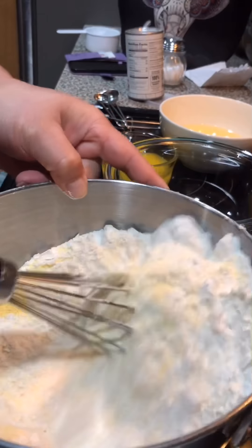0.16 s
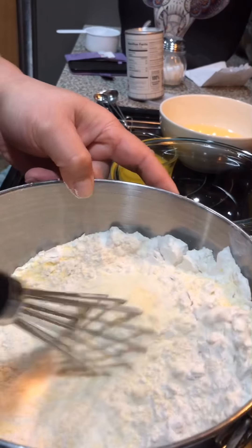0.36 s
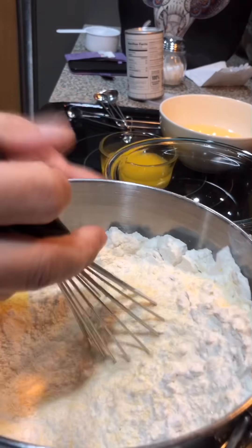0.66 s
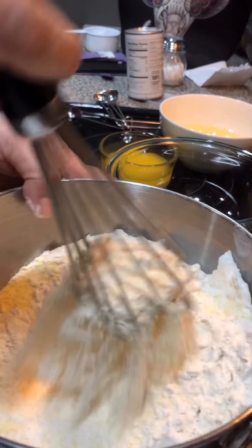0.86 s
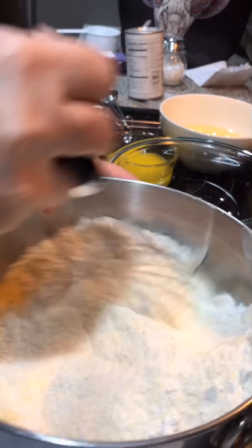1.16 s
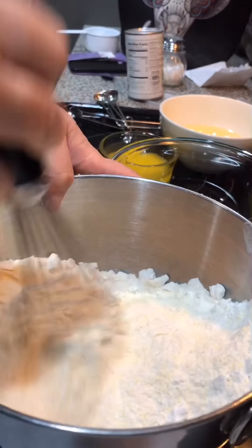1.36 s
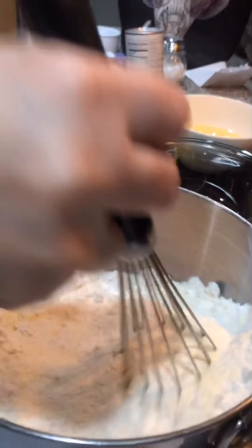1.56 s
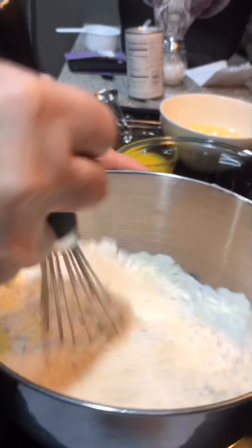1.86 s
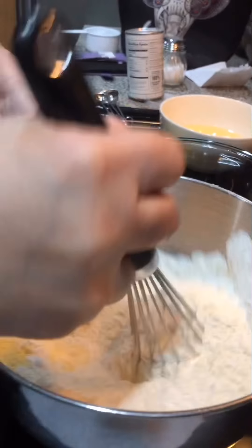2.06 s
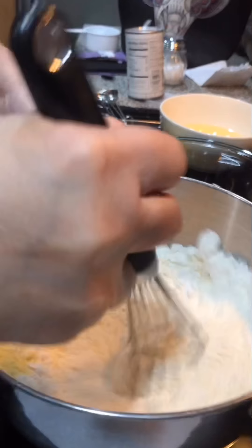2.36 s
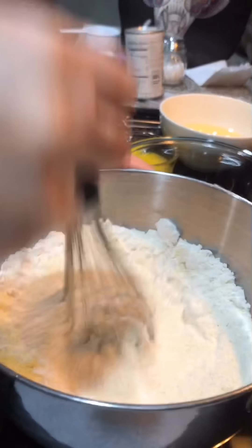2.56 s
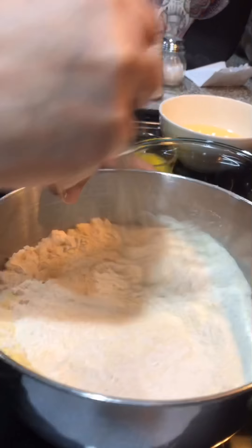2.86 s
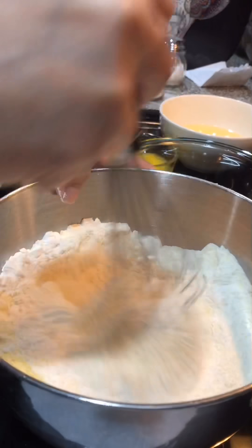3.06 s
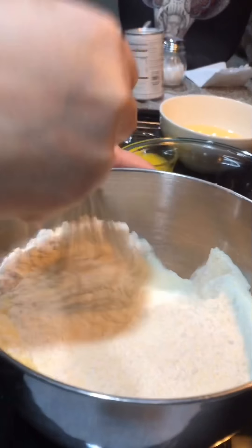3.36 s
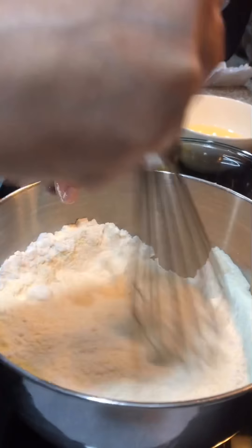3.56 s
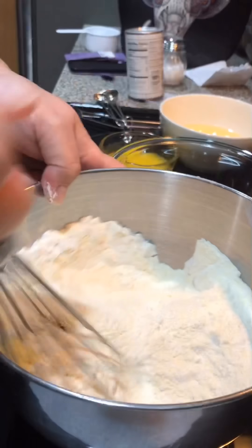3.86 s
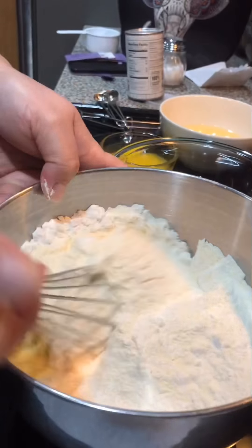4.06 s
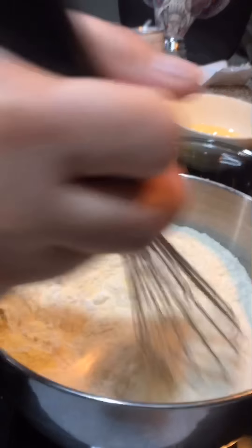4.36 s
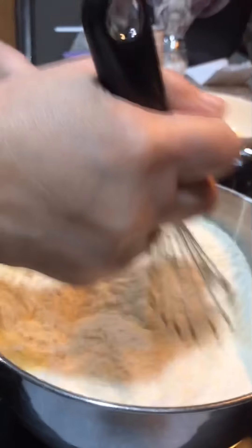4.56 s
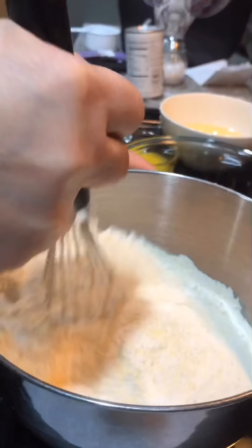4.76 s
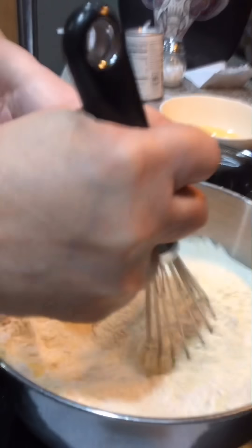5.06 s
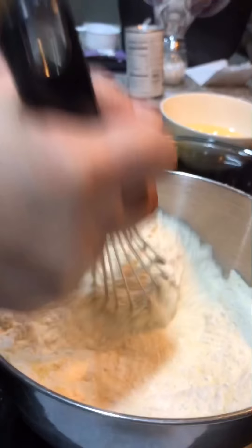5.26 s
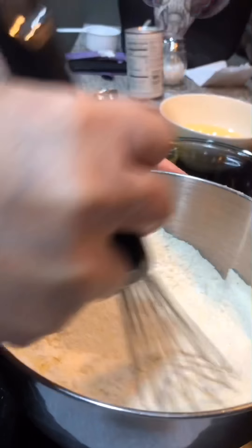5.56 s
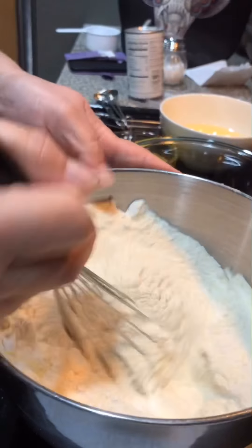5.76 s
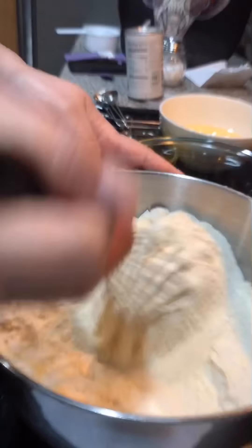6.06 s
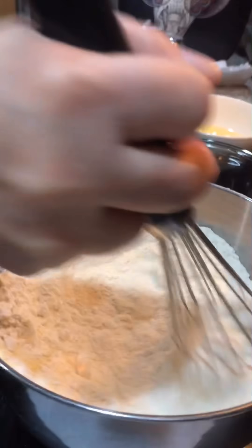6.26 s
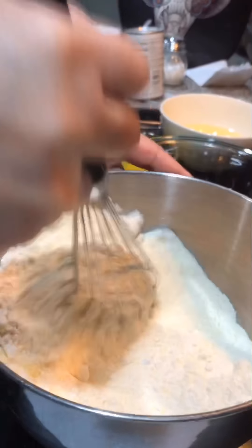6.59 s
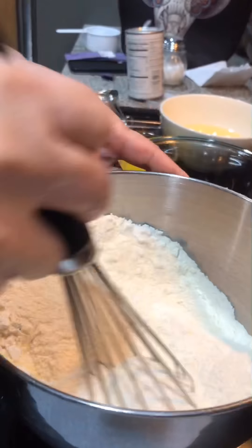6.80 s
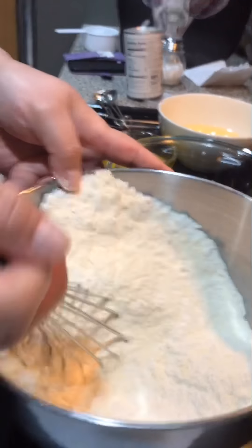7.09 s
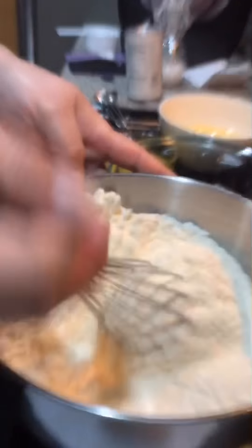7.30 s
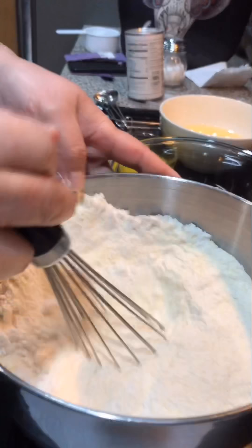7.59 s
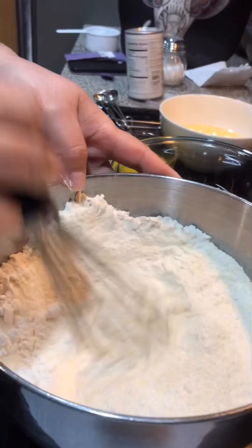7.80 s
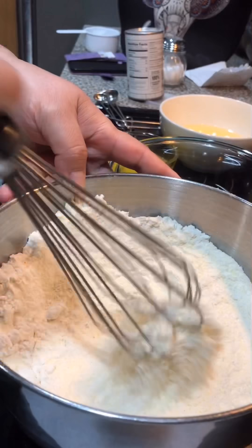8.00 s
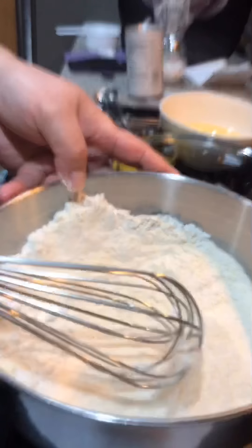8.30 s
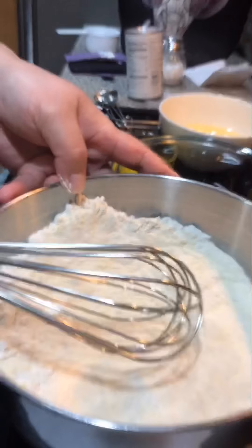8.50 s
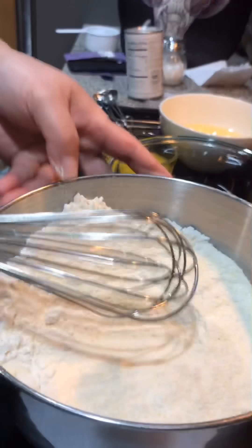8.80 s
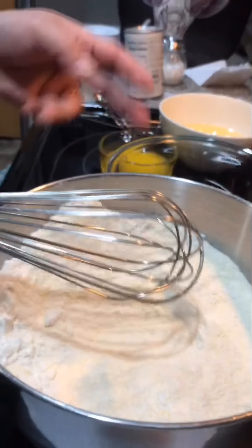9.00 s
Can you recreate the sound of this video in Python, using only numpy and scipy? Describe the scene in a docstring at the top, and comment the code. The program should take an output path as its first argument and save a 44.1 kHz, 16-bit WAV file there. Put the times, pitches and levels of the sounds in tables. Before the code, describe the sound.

A wire whisk swishes and scrapes through dry flour in a steel bowl, clicking and knocking, then raps sharply on the rim four times.

```python
"""Powder hisses through a wire whisk that scrapes, clicks and knocks in a hand-held steel bowl; an appliance hums.
A wire pings now and then, the shank clanks once, and at the end four raps on the rim shake the whisk clean.
Hiss and friction are streams of tiny grains, coloured and shaped by the strokes; wall blows excite a crowd of
damped modes, bottom knocks are dispersed pulses with a boom, rings are decaying sines, hum is wavering sines."""
import sys
import numpy as np
from scipy import signal
from scipy.fft import rfft, irfft
from scipy.io import wavfile
from scipy.ndimage import uniform_filter1d

SR = 44100
rng = np.random.default_rng(int(sys.argv[2]) if len(sys.argv) > 2 else 0)


def dump_mix(stems):
    """Bounce the given channels to the path in sys.argv[1] as a 16-bit WAV at rate SR."""
    frames = np.atleast_2d(stems).T  # one column per channel
    limited = np.clip(frames, -1, 1)  # hard clip at full scale
    pcm = np.round(limited * 32767).astype(np.int16)
    wavfile.write(sys.argv[1], SR, pcm)


N = 403070
T = np.arange(N) / SR
SLOW_T = T[::64]  # time grid of the stroke envelopes
RING = T[:SR // 3]  # time axis of one blow

# Event levels (peak, body, boom, ping) are rms over the loudest 256 samples.
# Appliance hum. Each row: frequency in Hz, mean level in dB.
HUM_TONES = [(59, -71.5), (120, -70.5), (295, -65), (414, -79), (475, -87.5), (940, -82)]
# Whisk sweeps through the powder. Each row: start in seconds, length in seconds, level in dB,
# change along the sweep in dB.
POWDER_SWEEPS = [(0.0, 0.092, -49, -4), (0.158, 0.14, -63, 2.5), (0.34, 0.18, -73, 5),
                 (0.56, 0.077, -72, 1), (0.685, 0.05, -57.5, -2.5), (0.808, 0.04, -62.5, -0.5),
                 (0.91, 0.079, -63, -9), (1.183, 0.22, -51.5, 0.5), (1.622, 0.21, -61, 3),
                 (1.86, 0.23, -51, 0.5), (2.169, 0.41, -52, -0.5), (2.617, 0.05, -65, -7),
                 (2.9, 0.13, -53.5, -8), (3.236, 0.015, -68, -2), (3.335, 0.13, -59.5, -3),
                 (3.71, 0.027, -62.5, -6), (3.827, 0.37, -44.5, -17), (4.316, 0.019, -72.5, 6),
                 (4.534, 0.32, -51, -11.5), (4.8, 0.064, -55.5, 3), (4.88, 0.27, -52, 1.5),
                 (5.181, 0.21, -53, -13.5), (5.48, 0.015, -66, -4), (5.594, 0.15, -57, 11),
                 (5.83, 0.033, -40, 2.5), (5.97, 0.22, -63.5, -11.5), (6.418, 0.24, -52.5, -10.5),
                 (6.854, 0.012, -50, -6), (6.936, 0.23, -55.5, 3), (7.218, 0.18, -55.5, -12),
                 (7.635, 0.042, -58.5, 0), (7.883, 0.03, -69.5, 1), (7.976, 0.022, -72, 0)]
# Wires pressed along the steel. Each row: start in seconds, length in seconds, wall scrape level in dB,
# squeak relative to that in dB, bottom rub level in dB.
STEEL_SCRAPES = [(0.0, 0.06, -74, 0, -57.5), (0.24, 0.2, -71.5, 6, -67), (0.69, 0.19, -71, 1, -61.5),
                 (1.2, 0.065, -56, -3, -56), (1.345, 0.11, -57, -18, -58.5), (1.65, 0.044, -60.5, 2, -62),
                 (1.724, 0.095, -50.5, -5, -52), (1.846, 0.11, -52, -5.5, -51),
                 (2.035, 0.13, -62, 5, -50.5), (2.27, 0.052, -46.5, 5, -54), (2.325, 0.041, -45, 11, -54),
                 (2.466, 0.058, -54.5, 6.5, -44), (3.323, 0.072, -54, -3, -49.5),
                 (3.789, 0.1, -64, -15, -48.5), (3.91, 0.12, -64, -2, -60), (4.52, 0.16, -52.5, -8, -51.5),
                 (4.561, 0.031, -45, -1, -47), (5.073, 0.044, -54, -7, -42), (5.099, 0.01, -47, 13, -45),
                 (5.157, 0.088, -53, -9, -51.5), (5.717, 0.054, -47.5, 0, -43.5),
                 (5.817, 0.057, -40.5, 4.5, -59), (6.419, 0.02, -51.5, -1, -49),
                 (6.457, 0.11, -51, -8.5, -51.5), (6.995, 0.055, -60.5, 7, -75),
                 (7.092, 0.096, -55, 5, -59), (7.34, 0.11, -69, -3, -59), (7.65, 0.047, -63.5, 3, -51)]
# Dull knocks on the powder-covered bottom. Each row: start in seconds, peak level in dB, boom level in dB,
# hardness (gain above HARD_HZ before levelling) in dB.
BOTTOM_KNOCKS = [(0.065, -42.5, -65, -8), (0.239, -40, -39, -14), (0.298, -48.5, -44, -6),
                 (0.761, -44, -69, -12), (0.864, -45.5, -53, -10), (1.176, -36.5, -64, -8),
                 (1.574, -30.5, -37.5, -3.5), (1.735, -26, -30.5, 6.5), (1.825, -40.5, -37.5, 0),
                 (1.943, -33.5, -41, -8), (2.165, -36, -54, -1), (2.28, -29, -37, -4),
                 (2.609, -31.5, -38, -5), (2.922, -32, -41, -4), (3.143, -55.5, -42.5, -6),
                 (3.355, -25.5, -28.5, 8), (3.558, -54, -42, -8), (3.763, -38.5, -58, -3),
                 (4.241, -45.5, -43, -6), (4.408, -31.5, -32.5, 3), (4.479, -28.5, -38.5, -1.5),
                 (4.604, -37, -46, -8), (5.104, -33.5, -46, -5), (5.268, -32, -33, -11),
                 (5.517, -47, -38.5, -8), (5.614, -36, -41, -2), (6.1, -46, -46, -2),
                 (6.179, -32.5, -33, -7), (6.465, -34, -35, 1.5), (6.688, -31, -41.5, -4),
                 (7.076, -29.5, -32, 3), (7.178, -42.5, -41, -8), (7.33, -35.5, -45, 13),
                 (7.374, -29.5, -39, -6), (7.644, -44.5, -50, 6), (8.376, -29.5, -30.5, -6),
                 (8.568, -28, -30, 7.5), (8.621, -35, -35, -4), (8.749, -22.5, -38, -8),
                 (8.947, -24.5, -27.5, 3), (9.015, -28, -42, 1.5)]
# Wires clicking on bare steel; a few rows, such as 1.7307 and 3.3542, are mostly the mid-band body that sounds
# with a hard knock on the bottom. Each row: start in seconds, peak level in dB, body level in dB.
WALL_CLICKS = [(0.0667, -43.5, -51), (0.637, -51.5, -57), (1.1782, -37, -35.5), (1.715, -38.5, -40),
               (1.7307, -54, -39), (1.862, -40, -43.5), (2.0297, -41.5, -46), (2.1702, -41, -56),
               (2.219, -42, -54), (2.324, -39, -52), (2.478, -40, -56), (2.5654, -39, -58),
               (3.0025, -49, -66), (3.305, -38, -38.5), (3.315, -33, -40), (3.3542, -61, -34),
               (3.3744, -45, -37), (3.7612, -29.5, -33), (3.767, -38, -42), (3.809, -42, -44),
               (3.844, -43.5, -45), (4.202, -53.5, -66), (4.516, -31.5, -40.5), (4.5706, -33.5, -39),
               (5.1034, -33.5, -38.5), (5.1262, -43, -53), (5.632, -37.5, -39.5), (5.689, -43, -49),
               (5.721, -42, -40.5), (6.401, -32.5, -46.5), (6.4157, -40, -40.5), (7.0733, -40.5, -47),
               (7.14, -42, -52), (7.647, -54.5, -61), (8.586, -55, -56)]
# A wire slips free and pings. Each row: start in seconds, level in dB.
WIRE_PINGS = [(1.86, -40), (1.94, -47), (2.027, -47), (3.001, -52), (4.645, -49.5), (5.167, -44.5),
              (7.137, -42.5), (7.352, -47.5), (8.479, -47.5), (8.64, -57)]
# Hard drags: wires judder, bowl groans. Each row: start in seconds, length in seconds, level at mid-drag in dB.
HARD_DRAGS = [(5.062, 0.072, -53), (5.125, 0.031, -28.5), (5.15, 0.051, -39), (5.704, 0.1, -40)]
# Raps on the rim. Each row: start in seconds, peak level in dB, body level in dB, chatter length in seconds.
RIM_RAPS = [(8.374, -26, -30, 0.028), (8.529, -37.5, -38.5, 0.027), (8.749, -24, -28, 0.024),
            (8.926, -27, -28.5, 0.023)]

# Low modes of the bowl. Each row: frequency in Hz, relative level in dB, 60 dB decay time in seconds.
BOWL_LOW_MODES = [(111, -5.5, 0.39), (162.6, 2, 0.24), (165.8, 8, 0.2), (289.8, -7.5, 0.19),
                  (362, -17, 0.48), (552, -12, .13), (733, -22, .08)]
# Rim and wires, ringing freely. Each row: frequency in Hz, relative level in dB, 60 dB decay time in seconds.
WIRE_RING_MODES = [(548, 1, .2), (1340, -15, .15), (2794, -17, .25), (4081, -25, .25), (5238, 0, .2),
                   (5256, -4, .2), (5320, -8, .1), (5475, -12, .2), (5663, -12, .2), (5739, -9, .2),
                   (7047, -14, .2), (9190, -14, .15)]

# Colours of the sounds. Each row: frequency in Hz, relative spectral level in dB.
AIR_COLOUR = [(20, -39.5), (45, -9.5), (105, -5), (170, 2.5), (240, -9.5), (330, -9.5), (680, -24.5),
              (1600, -24.5), (2400, -29), (3400, -34.5), (6000, -38), (10000, -46), (16000, -48)]
POWDER_COLOUR = [(500, -27.5), (1500, -13), (4500, -13.5), (6500, -3.5), (8300, 0), (9500, 3.5),
                 (11000, -2.5), (13000, -7.5), (16000, -4)]
SCRAPE_COLOUR = [(350, -18.5), (700, 9.5), (1050, -12.5), (1280, 4), (1600, -0.5), (2200, 1), (2700, -1),
                 (3700, -1.5), (4600, -0.5), (6000, -3.5), (7200, -1), (8200, -2), (9800, -6.5),
                 (12000, -6.5), (16000, -5)]
RUB_COLOUR = [(40, -34.5), (110, 6), (165, 13), (230, 4.5), (340, -1.5), (720, 1), (1100, -11.5),
              (2200, -29)]
KNOCK_COLOUR = [(25, -46), (70, -6), (130, -4), (220, -1.5), (320, 4.5), (650, -1), (950, -11),
                (1600, -21.5), (4000, -31.5), (8000, -43), (16000, -64.5)]
CLICK_TOP_COLOUR = [(1000, -33), (2200, -1.5), (3500, -9), (4700, -11), (5600, -3), (6600, -2.5), (8200, 1),
                    (9400, 0), (11500, -6), (16000, -16)]
CLICK_BODY_COLOUR = [(200, -27), (550, -8), (800, 6.5), (1050, -4.5), (1270, 5), (1700, -16.5),
                     (3000, -24.5)]
CLANK_COLOUR = [(350, -25.5), (700, -4.5), (920, 3.5), (1080, -4), (1230, 3.5), (1600, -7.5), (2700, -12),
                (4200, -12), (5000, -8), (5700, -1), (7200, -6), (9000, -3.5), (11500, -13.5),
                (16000, -19.5)]
RAP_TOP_COLOUR = [(1000, -26), (2400, -5.5), (3300, -10.5), (4100, -5.5), (4800, -13.5), (5500, -4),
                  (6400, -4), (7400, -1), (8200, -1.5), (9200, 5.5), (10500, -4), (12000, -12.5),
                  (16000, -27)]
RAP_BODY_COLOUR = [(70, -22), (160, 13), (350, -5), (560, 2), (800, -4.5), (1100, -7), (1400, -1.5),
                   (3000, -46), (6000, -22.5)]

AIR_DB = -55  # mean, before a slow wander
SWEEP_RISE_S, SWEEP_FALL_S = 0.08, 0.15  # 60 dB edge times of the shortest flick
SCRAPE_RISE_S, SCRAPE_FALL_S = 0.12, 0.16  # likewise
EDGE_SHARE = 0.4  # share of the stroke length added to each edge time
BRUSH_WALL_DB, BRUSH_BOTTOM_DB = -16, -16.5  # steel brushed by every sweep, relative to its hiss
IDLE_POWDER_DB, IDLE_WALL_DB, IDLE_BOTTOM_DB = -89, -78, -66.5  # constant light contact
BRIGHT_HZ, BRIGHT_TOP_HZ = 2620, 5570  # band of the squeak on bare steel
HARD_HZ = 1450  # a hard knock differs from a soft one above this
BOOM_DELAY_S = 0.0034
CLICK_CHATTER_S = 0.0072  # time over which the wires of one click land
CLANK_S, CLANK_DB = 2.8893, -14
JUDDER_HZ = 166
RAP_RING_DB = -1.5  # free ring relative to the clash
TOP_HZ = 15900  # top of the wall modes and of the phone's band


def undb(db):
    """Decibels to gain."""
    return 10 ** (np.asarray(db) / 20)


def unit(x):
    """Scale to rms 1."""
    return x / np.sqrt(np.mean(x ** 2))


def unit_peak(x, size=256):
    """Scale so that the loudest few milliseconds have rms 1."""
    return x / np.sqrt(uniform_filter1d(x ** 2, size).max())


def add(track, start_s, sound):
    """Mix a sound into the track at start_s."""
    start = max(int(start_s * SR), 0)
    track[start:start + len(sound)] += sound[:N - start]


def colour(x, points):
    """Causal minimum-phase filter through (Hz, dB) points."""
    size = 4096
    hz, db = np.transpose(points)
    bin_hz = np.fft.rfftfreq(size, 1 / SR)
    log_gain = np.log(undb(np.interp(np.log1p(bin_hz), np.log(hz), db)))
    # fold the cepstrum to make the filter causal
    cepstrum = irfft(log_gain)
    cepstrum[1:size // 2] *= 2
    cepstrum[size // 2 + 1:] = 0
    impulse_response = irfft(np.exp(rfft(cepstrum)))
    return signal.fftconvolve(x, impulse_response)[:len(x)]


def uneven(points, ripple_db):
    """Each spot of the wall favours other parts of the spectrum."""
    return [(hz, db + ripple_db * rng.standard_normal()) for hz, db in points]


def split(x, hz):
    """The parts of a sound below and above hz, without phase shift."""
    low = signal.sosfiltfilt(signal.butter(2, hz, fs=SR, output="sos"), x, padtype=None)
    return low, x - low


def fade(t, t60):
    """Exponential decay, 60 dB in t60 seconds."""
    return np.exp(-np.log(1000) * t / t60)


def walk(rate_hz):
    """Smooth random wander, rms 1 or near it."""
    hold = max(int(SR / rate_hz), 1)
    steps = np.repeat(rng.standard_normal(N // hold + 1), hold)
    return unit(uniform_filter1d(steps, hold)[:N])


def grains(per_s, spread_db):
    """Random tiny impacts of unequal size, rms 1."""
    size = undb(spread_db * np.minimum(rng.exponential(size=N), 4))
    hits = rng.random(N) < per_s / SR
    return unit(hits * size * rng.standard_normal(N))


def ring(modes, scatter_db):
    """Damped modes; every blow shares its energy among them a little differently."""
    hz, db, t60 = np.transpose(modes)[:, :, None]
    gain = undb(db + scatter_db * rng.standard_normal(hz.shape))
    return np.sum(gain * np.sin(2 * np.pi * hz * RING) * fade(RING, t60), axis=0)


def shell(t60, count=420):
    """The thin wall's crowd of modes, damped by hand and powder: one row per mode."""
    t = RING[:len(RING) // 2]
    hz = (np.arange(count) + rng.random(count))[:, None] * TOP_HZ / count
    return np.sin(2 * np.pi * hz * t) * fade(t, t60)


def strike(wall):
    """A tap at a random spot weights the wall's modes at random."""
    return rng.standard_normal(len(wall)) @ wall


def chatter(length_s, bounce, per_s):
    """Force of a first contact, then of the other wires landing in quick succession."""
    hits = rng.random(len(RING)) < per_s / SR
    landing = hits * rng.choice([-1, 1], len(RING)) * rng.uniform(0.72, 1, len(RING))
    force = bounce * landing * np.exp(-(RING / max(length_s, 1 / SR)) ** 4)
    force[0] = 1
    return force


def bending_wave(travel_s):
    """A pulse spread by the steel: speed grows with the root of frequency; 1 kHz arrives after travel_s."""
    khz = np.fft.rfftfreq(len(RING), 1 / SR) / 1000
    return irfft(np.exp(-4j * np.pi * 1000 * travel_s * np.sqrt(khz)), len(RING))


def stroke(start_s, length_s, rise_s, fall_s):
    """Envelope of one arm movement: it swells, holds and dies away; longer strokes have gentler edges."""
    ease_s = EDGE_SHARE * length_s
    before = (start_s - SLOW_T) / (rise_s + ease_s)
    after = (SLOW_T - start_s - length_s) / (fall_s + ease_s)
    return fade(np.clip(np.maximum(before, after), 0, 2), 1)


def envelope(power):
    """Summed power of overlapping strokes, as a gain for every sample."""
    return np.interp(T, SLOW_T, np.sqrt(power))


def sliding(points, per_s, spread_db, count=5):
    """Stick and slip along the steel; resonances shift as the contact travels from spot to spot."""
    out = 0
    t = RING[:len(RING) // 4]
    for _ in range(count):
        spot = colour(rng.standard_normal(len(t)) * fade(t, t60=.03), uneven(points, ripple_db=3))
        out = out + signal.oaconvolve(grains(per_s, spread_db), unit(spot))[:N] * walk(16) ** 2
    # waves return from the rim after a wandering lag, so the resonances glide
    lag_s = .002 * np.exp(.1 * walk(7))
    out = out + .55 * np.interp(T - lag_s, T, out)
    local_rms = np.sqrt(uniform_filter1d(out ** 2, SR // 25))
    return unit(out / local_rms)


def kitchen_air():
    """Low air noise: coloured noise with a slowly wandering level."""
    return unit(colour(rng.standard_normal(N), AIR_COLOUR)) * undb(AIR_DB + 0.92 * walk(2.2))


def appliance_hum():
    """Steady tones that waver in level and phase."""
    out = np.zeros(N)
    for hz, db in HUM_TONES:
        gain = undb(db + 1.0 * walk(2.6))
        out += gain * unit(np.sin(2 * np.pi * hz * T + 0.71 * walk(5.3)))
    return out


def sweep_power():
    """Summed power of the whisk's sweeps, each changing level along its way."""
    power = 0
    for start_s, length_s, db, change_db in POWDER_SWEEPS:
        progress = np.clip((SLOW_T - start_s) / length_s, 0, 1)
        gain = undb(db + change_db * progress)
        power = power + (gain * stroke(start_s, length_s, SWEEP_RISE_S, SWEEP_FALL_S)) ** 2
    return power


def powder_hiss(flow):
    """Powder sifts through the wires: dense coloured grains whose level flickers."""
    hiss = unit(colour(grains(per_s=10000, spread_db=-0.8), POWDER_COLOUR))
    flicker = undb(0.6 * walk(72) + 0.6 * walk(20))
    return hiss * flicker * envelope(flow + undb(IDLE_POWDER_DB) ** 2)


def wall_scrape(flow):
    """Wires stick and slip on the wall; the squeak band has its own level on bare steel."""
    on_wall = on_bare = flow * undb(BRUSH_WALL_DB) ** 2 + undb(IDLE_WALL_DB) ** 2
    for start_s, length_s, wall_db, squeak_db, _ in STEEL_SCRAPES:
        press = stroke(start_s, length_s, SCRAPE_RISE_S, SCRAPE_FALL_S)
        on_wall = on_wall + (press * undb(wall_db)) ** 2
        on_bare = on_bare + (press * undb(wall_db + squeak_db)) ** 2
    friction = sliding(SCRAPE_COLOUR, per_s=1500, spread_db=2.5)
    _, bright = split(friction, BRIGHT_HZ)
    squeak, _ = split(bright, BRIGHT_TOP_HZ)
    return (friction - squeak) * envelope(on_wall) + squeak * envelope(on_bare)


def bottom_rub(flow):
    """Wires stick and slip on the bottom, a low rubbing."""
    on_bottom = flow * undb(BRUSH_BOTTOM_DB) ** 2 + undb(IDLE_BOTTOM_DB) ** 2
    for start_s, length_s, _, _, bottom_db in STEEL_SCRAPES:
        press = stroke(start_s, length_s, SCRAPE_RISE_S, SCRAPE_FALL_S)
        on_bottom = on_bottom + (press * undb(bottom_db)) ** 2
    return sliding(RUB_COLOUR, per_s=900, spread_db=2.5) * envelope(on_bottom)


def knocks():
    """A wire snaps through powder onto the bottom: a falling chirp, its reflections, then the bowl's boom."""
    out = np.zeros(N)
    for start_s, db, boom_db, hard_db in BOTTOM_KNOCKS:
        reflections = rng.standard_normal(len(RING)) * fade(RING, t60=.11) * (1 - fade(RING, t60=.02))
        wave = colour(bending_wave(travel_s=.0022) + .036 * reflections, KNOCK_COLOUR)
        thud, snap = split(wave, HARD_HZ)
        knock = thud + snap * undb(hard_db)
        boom = ring(BOWL_LOW_MODES, scatter_db=3.0)
        add(out, start_s, unit_peak(knock) * undb(db))
        add(out, start_s + BOOM_DELAY_S, unit_peak(boom) * undb(boom_db))
    return out


def clicks(wall):
    """Wires flick against the bare wall, which answers with a short bright clack; a few clacks add mid-band
    body to hard knocks on the bottom."""
    out = np.zeros(N)
    for start_s, db, body_db in WALL_CLICKS:
        # the first wave straight from the contact is stronger than the ring that follows
        answer = strike(wall) * (1 + 0.94 * fade(RING[:wall.shape[1]], t60=0.0062))
        clack = signal.fftconvolve(chatter(CLICK_CHATTER_S, bounce=0.43, per_s=1000), answer)
        top = colour(clack, uneven(CLICK_TOP_COLOUR, ripple_db=2.5))
        body = colour(clack, CLICK_BODY_COLOUR)
        add(out, start_s, unit_peak(top) * undb(db))
        add(out, start_s, unit_peak(body) * undb(body_db))
    return out


def pings():
    """A bent wire springs back; its high modes ring briefly in the powder."""
    out = np.zeros(N)
    for start_s, db in WIRE_PINGS:
        # all but the two lowest modes, with extra damping
        twang = ring(WIRE_RING_MODES[2:], scatter_db=11.0)[:SR // 4] * fade(RING[:SR // 4], t60=0.11)
        flutter = signal.fftconvolve(chatter(0.01, bounce=0.68, per_s=840), twang)
        add(out, start_s, unit_peak(flutter) * undb(db))
    return out


def clank():
    """The stiff shank meets the rim once, hard and dry: a coloured burst of decaying noise."""
    out = np.zeros(N)
    crack = rng.standard_normal(len(RING)) * fade(RING, t60=0.043)
    add(out, CLANK_S, unit_peak(colour(crack, CLANK_COLOUR)) * undb(CLANK_DB))
    return out


def judder():
    """Hard drags make the bowl groan near its strongest low mode, with a wavering phase."""
    groan = 0
    for start_s, length_s, db in HARD_DRAGS:
        progress = np.clip((T - start_s) / length_s, 0, 1)
        groan = groan + undb(db) * np.sin(np.pi * progress)
    return unit(np.sin(2 * np.pi * JUDDER_HZ * T + 0.22 * walk(55))) * groan


def raps(wall):
    """The whisk hits the rim: its loops clash together, then ring on in the open air."""
    out = np.zeros(N)
    for start_s, db, body_db, length_s in RIM_RAPS:
        clash = signal.fftconvolve(chatter(length_s, bounce=0.19, per_s=2200), strike(wall))
        add(out, start_s, unit_peak(colour(clash, RAP_TOP_COLOUR)) * undb(db))
        add(out, start_s, unit_peak(colour(clash, RAP_BODY_COLOUR)) * undb(body_db))
        # the ring builds while the loops clash, and the grip soon takes most of it
        build = np.minimum(RING / .012, 1)
        grip = .15 + fade(np.maximum(RING - length_s, 0), t60=.05)
        free_ring = ring(WIRE_RING_MODES, scatter_db=5.0) * build * grip
        add(out, start_s, unit_peak(free_ring) * undb(db + RAP_RING_DB))
    return out


def room(x, t60, wet_db):
    """Diffuse echo of cupboards and counter, duller than the direct sound."""
    t = T[:SR]
    noise = rng.standard_normal(SR) * fade(t, t60) * (1 - fade(t, t60=0.049))
    tail = colour(noise, [(100, 8), (1000, 1.0), (6000, -3.5), (9500, -15), (15000, -7.0)])  # Hz, dB
    return signal.fftconvolve(x, tail / np.linalg.norm(tail))[:N] * undb(wet_db)


def scene():
    """Bowl and whisk close by, the kitchen around them."""
    wall = shell(t60=0.043)
    flow = sweep_power()
    stirring = powder_hiss(flow) + wall_scrape(flow) + bottom_rub(flow) + judder()
    bowl = stirring + knocks() + clicks(wall) + pings() + clank() + raps(wall)
    echo = room(bowl, t60=0.38, wet_db=-17.5)
    kitchen = kitchen_air() + appliance_hum()
    return (bowl + echo + kitchen)[None]


def record(dry):
    """The phone rolls off the deep bass and cuts the top of the treble."""
    thinned = signal.sosfilt(signal.butter(2, 50, "highpass", fs=SR, output="sos"), dry)
    return signal.sosfilt(signal.ellip(10, .2, 70, TOP_HZ, fs=SR, output="sos"), thinned)


dry = scene()
out = record(dry)
dump_mix(out)
```